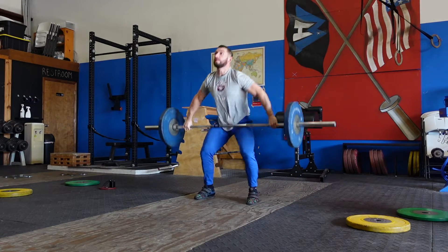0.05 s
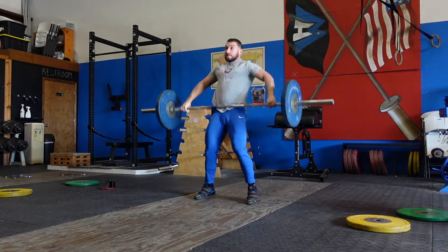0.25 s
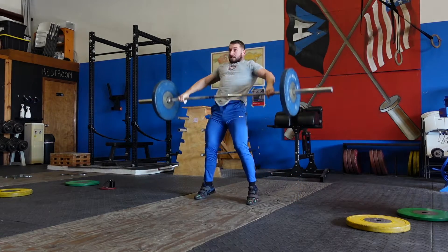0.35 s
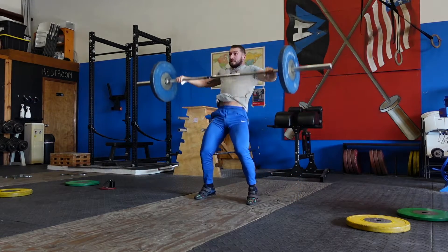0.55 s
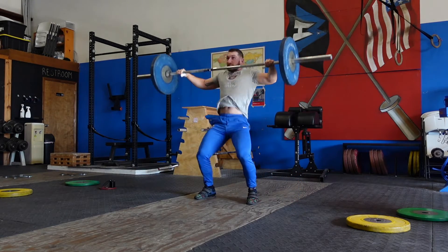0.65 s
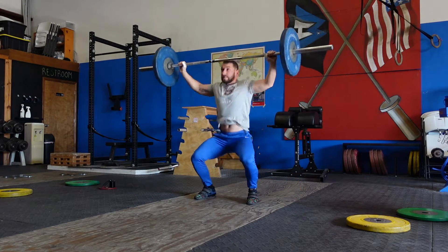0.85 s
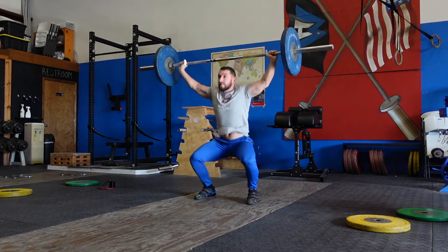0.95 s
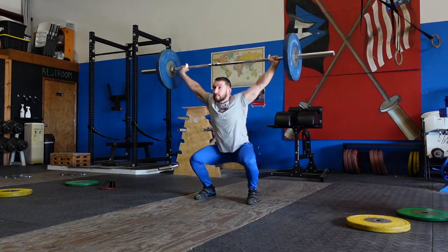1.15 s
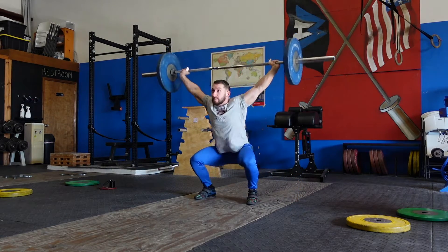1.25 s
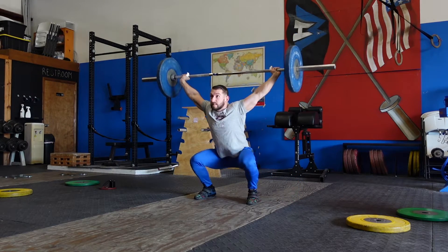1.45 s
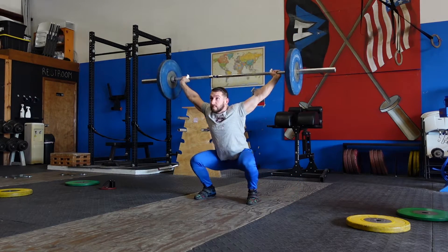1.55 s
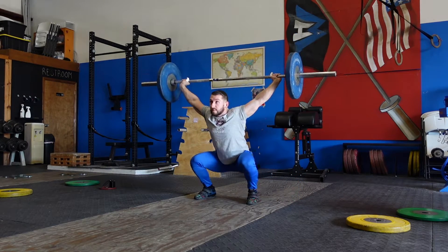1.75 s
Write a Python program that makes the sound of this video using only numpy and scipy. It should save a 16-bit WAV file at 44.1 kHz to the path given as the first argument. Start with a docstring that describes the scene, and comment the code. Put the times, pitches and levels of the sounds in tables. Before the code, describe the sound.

Barbell plates clatter during a quick lift, followed by a foot stamp in an echoing gym.

```python
"""In a large, hard-walled gym, a lifter snatches a barbell from the floor to overhead. The bar brushes
up the thighs, the rubber plates clank and thud on their sleeves (the ends of the bar), and the steel
collars click and rattle through the pull. Both shoes stamp on the wooden platform, the loaded bar hums
and knocks faintly overhead, and the hall rings on over a low ventilation rumble."""
import sys
import numpy as np
from scipy import signal
from scipy.fft import rfft, irfft, next_fast_len
from scipy.io import wavfile

SR = 44100
rng = np.random.default_rng(int(sys.argv[2]) if len(sys.argv) > 2 else 0)


def waveform_to_disk(signal):
    """Save audio, clipped to [-1, 1], as 16-bit WAV at the path in sys.argv[1]."""
    frames = np.transpose(np.atleast_2d(signal))
    scaled = np.clip(frames, -1, 1) * 32767
    samples = np.round(scaled).astype(np.int16)
    wavfile.write(sys.argv[1], SR, samples)


N = 79380
T = np.arange(N) / SR
RING_T = T[:SR // 5]  # the clock for one hit

# Plate hits; the one at 0.33 s is the loud clank's echo off the far wall. Each favours two tones:
# t/s, level/dB, main f/Hz, second f/Hz, second level/dB, level of all tones/dB, onset/s
PLATE_HITS = [(.2000, -40, 1270, 1680, -3, 2, 0.0019), (.2335, -2, 1680, 655, -5, -30, .0036),
              (.2866, 2, 1260, 1150, -8, -28, .0030), (0.3292, -15.5, 1140, 1300, 9, -16, 0.00084),
              (.4683, -7.5, 1740, 710, -3, -13, .0004), (.4780, -7.5, 1220, 611, -6, -18.5, 0.00033),
              (.4885, -52, 1200, 1710, -20, -13, 0.0004), (.5790, -21, 1600, 655, 0, -30, 0.004),
              (.6368, -4, 1150, 1574, -23, -14, 0.0022), (.6420, -5, 770, 1560, -1, -17, .003),
              (1.5040, -23.5, 975, 1834, -18.5, -26, 0.00062), (1.5460, -34, 950, 1170, -15, -29, 0.0023),
              (1.6460, -40, 1620, 1160, 0, -4.5, 0.0018)]
def plates():
    """The plates clank in the pull and knock softly overhead; returns rings and scuffs apart."""
    out = np.zeros((2, N))
    for s, db, main_hz, second_hz, second_db, others_db, onset_s in PLATE_HITS:
        others = amp(others_db) * rng.choice([-1, 1], len(PLATE_TONES))
        favoured = favour(PLATE_TONES, main_hz) + amp(second_db) * favour(PLATE_TONES, second_hz)
        add(out, s, amp(db) * clank(favoured + others, onset_s))
    return out

# The tones of a plate on its sleeve: f/Hz, level/dB, ring time/s
PLATE_TONES = [(655, 0, .028), (770, 0, .028), (950, -2, .024), (1150, -1, .028), (1270, 0, .032),
               (1560, 0, .028), (1680, 0, .03), (1800, -3, .022), (2550, -8, .02), (2870, -8, .025)]
# The noise of plate meeting sleeve: f/Hz, level/dB
SCUFF_COLOUR = [(60, -44), (300, -20.5), (600, 3), (1800, -7.5), (2300, -8.5), (3000, -22), (5000, -27.5),
                (10000, -59)]
def clank(weights, onset_s, t=RING_T):
    """A plate drops against its sleeve: a ring cut short by the rubber, and a scuff."""
    body = ring(PLATE_TONES, weights, t)
    scuff = amp(-14.5) * np.linalg.norm(weights) * noise(SCUFF_COLOUR, len(t)) * fade(t, ring_s=.048)
    return np.array([body, scuff]) * rise(onset_s)

# Collar hits, each with one tone that pings out: t/s, level/dB, ping f/Hz, ping level/dB
COLLAR_HITS = [(0.165, -42, 3730, -4), (0.2118, -37.5, 2940, 4), (0.2323, -32.5, 2920, 11.5),
               (0.2447, -24, 3850, -2), (0.2586, -35, 7540, -12), (0.285, -33.5, 2390, 18.5),
               (0.33, -51, 3920, -12), (0.3407, -31, 6200, 3.5), (0.3918, -28, 5880, 11.5),
               (0.3958, -32, 6200, -2), (0.4244, -28, 4290, -10), (0.47, -24.5, 6230, -5),
               (0.488, -21, 6480, 5.5), (0.5009, -24.5, 4100, 5), (0.5355, -27.5, 4290, -10),
               (0.6015, -25, 6300, -1.5), (0.6422, -25.5, 6330, 8.5), (0.6564, -28.5, 4290, 2.5)]
def collars():
    """The collars click sharply as the loose sleeves knock into place."""
    out = np.zeros(N)
    for s, db, ping_hz, ping_db in COLLAR_HITS:
        add(out, s, amp(db) * click(amp(ping_db) * favour(STEEL_TONES, ping_hz)))
    return out

# The tones of the steel sleeve and collar: f/Hz, level/dB, ring time/s
STEEL_TONES = [(2550, -8.5, 0.024), (2910, -5, 0.021), (3866, -0.5, 0.028), (4280, 0.5, 0.017),
               (4670, -2, 0.023), (5973, -7.5, 0.023), (6260, -5.5, 0.016), (6530, -18.5, 0.04),
               (7260, -19, .02)]
# The noise of steel meeting steel: f/Hz, level/dB
CRACK_COLOUR = [(500, 6.5), (2500, 16), (4500, 3), (6500, 0), (8000, -8.5), (10500, -20.5)]
def click(ping=0):
    """Steel hits steel: a crack and a short, bright ring in which some tones may ping out."""
    count = len(STEEL_TONES)
    weights = amp(-7 + 2 * rng.standard_normal(count)) * rng.choice([-1, 1], count)
    body = ring(STEEL_TONES, weights, detuned()) + ring(STEEL_TONES, ping * np.ones(count), RING_T)
    crack = amp(1.5) * noise(CRACK_COLOUR, len(RING_T)) * fade(RING_T, ring_s=.026)
    return (body + crack) * rise(onset_s=.0004)

# How loud the metallic shimmer is: t/s, level/dB
SHIMMER_LEVELS = [(.328, -18.5), (.37, -19.5), (.42, -20.5), (.46, -27), (0.518, -27), (.62, -27),
                  (.70, -33), (.76, -51)]
def shimmer(pairs_per_s=170, scatter_db=1.5):
    """A dense metallic shimmer: the loud clank echoing round the hall, then light rattling."""
    out = np.zeros(N)
    times, levels = np.transpose(SHIMMER_LEVELS)
    weights = favour(PLATE_TONES, hz=1209) + .5 * amp(-7)
    for slot in np.arange(times[0], times[-1], 1 / pairs_per_s):
        plate_s, steel_s = slot + rng.random(2) / pairs_per_s
        plate_db, steel_db = np.interp(slot, times, levels) + scatter_db * rng.standard_normal(2)
        signs = rng.choice([-1, 1], len(PLATE_TONES))
        tiny_clank = clank(weights * signs, onset_s=.0018, t=detuned())
        add(out, plate_s, amp(plate_db) * tiny_clank.sum(axis=0))
        add(out, steel_s, amp(steel_db - 15) * click())
    return out

# Shoes landing; the hit at 0.78 s is the stamp's echo off the far wall:
# t/s, slap level/dB, thump level/dB
SHOE_HITS = [(0.362, -21, -20.5), (0.465, -18, -24.5), (.7450, -6, -6.5), (0.7836, -19.5, -14.5),
             (0.9414, -12, -18.5)]
# The tones of the platform: f/Hz, level/dB, ring time/s
PLATFORM_TONES = [(125, -13, 0.088), (161, -12, 0.038), (260.4, -6, 0.028), (361, -3.5, 0.027),
                  (540, -44, .018)]
def shoes(slap_hz=720, slap_peak_s=.0018, slap_width_s=.001, thump_lag_s=.0034, bass_cut_hz=93):
    """A flat sole slaps the boards, then the platform thumps."""
    out = np.zeros(N)
    from_peak = RING_T - slap_peak_s
    slap = np.cos(2 * np.pi * slap_hz * from_peak) / np.cosh(from_peak / slap_width_s) ** 2
    slap *= np.minimum(2 * RING_T / slap_peak_s, 1)  # start from silence
    for s, slap_db, thump_db in SHOE_HITS:
        weights = amp(rng.standard_normal(len(PLATFORM_TONES)))
        thump = ring(PLATFORM_TONES, weights, RING_T) * rise(onset_s=.00066)
        add(out, s, amp(slap_db) * slap)
        add(out, s + thump_lag_s, -amp(thump_db) * thump)
    return signal.sosfilt(signal.butter(2, bass_cut_hz, "high", fs=SR, output="sos"), out)

# How loud the low thud is: t/s, level/dB
THUD_LEVELS = [(.20, -56.5), (.26, -42), (.36, -39.5), (.48, -40.5), (.62, -42), (.74, -72)]
# The deep noise of the thud: f/Hz, level/dB
THUD_COLOUR = [(50, -34), (100, -0.5), (140, 2.5), (210, -5), (290, -20), (450, -8.5), (900, -13.5),
               (3000, -90)]
def plate_thud():
    """A low thud and rumble under the plate clanks."""
    return swell(THUD_LEVELS, THUD_COLOUR)

# The bar's slide up the thighs: t/s, level/dB
SLIDE_LEVELS = [(.07, -71), (.105, -52.5), (.135, -43), (.16, -54.5), (.22, -48.5), (.30, -81)]
# The hiss of rubbed cloth: f/Hz, level/dB
CLOTH_COLOUR = [(300, -23.5), (1400, 6.5), (2500, 8), (3000, 15), (4000, 6), (6500, 2), (8000, -8.5),
                (10500, -18)]
def trousers():
    """The cloth swishes as the bar rubs over it."""
    return swell(SLIDE_LEVELS, CLOTH_COLOUR)

# The tones of the bending bar: f/Hz, level/dB, ring time/s
BAR_TONES = [(114.1, -40, 7.2), (184.7, -46, 8.2), (213.5, -48.5, 9)]
def bar_hum(catch_s=.64, swell_s=.027):
    """Once caught, the bar quivers under its load and hums."""
    t = np.maximum(T - catch_s, 0)
    return ring(BAR_TONES, np.ones(len(BAR_TONES)), t) * (1 - np.exp(-t / swell_s))

# How long the hall echoes: f/Hz, ring time/s
ECHO_TIMES = [(100, 1.8), (220, 1.06), (400, 1.18), (700, 1.24), (1400, 1.66), (3000, 1.75), (6000, 0.85),
              (10000, 1.54)]
# How strong the echo is, from low to high: f/Hz, level/dB
ECHO_COLOUR = [(80, -13), (200, 12.5), (500, -4), (1200, -0.5), (3000, -3.5), (6000, -3), (10000, 0)]
# How wide the echo is, as side (left minus right) against mid (shared by both): f/Hz, level/dB
ECHO_WIDTH = [(40, -34), (120, -39), (300, -13), (1200, -13.5), (4000, -16), (10000, -53)]
def hall(sound, direct_db=0, far_wall_s=.04, near_db=-6.5):
    """The sound itself, weak echoes from nearby, then the far walls' wash; returns mid and side."""
    hz, t, bands = signal.stft(rng.standard_normal((2, N)), SR, nperseg=512)
    colour = amp(along(ECHO_COLOUR, hz) + np.outer([0, 1], along(ECHO_WIDTH, hz)))
    bands = bands * fade(t, along(ECHO_TIMES, hz)[:, None]) * colour[:, :, None]
    tail = signal.istft(bands, SR, nperseg=512)[1][:, :N]
    tail *= np.where(T < far_wall_s, amp(near_db), 1)
    mid, side = np.sqrt(10 / SR) * signal.fftconvolve(sound[None], tail, axes=1)[:, :N]
    return np.array([amp(direct_db) * sound + mid, side])

# The rumble of moving air: f/Hz, level/dB
VENT_COLOUR = [(20, -14), (36, 3), (50, 1), (72, 5.5), (120, 2), (160, -17), (220, -18), (400, -22),
               (1000, -23.5), (1600, -33), (3000, -37.5), (4500, -39.5), (7000, -43), (10500, -46)]
def ventilation():
    """Air from the vents rumbles low and steady; returns mid and side."""
    return amp(-45) * np.array([noise(VENT_COLOUR, N), amp(-15) * noise(VENT_COLOUR, N)])

def amp(db):
    """Turn decibels into a multiplier."""
    return 10 ** (np.asarray(db) / 20)

def along(points, hz):
    """Read a table between its rows, on a scale of pitch."""
    f, values = np.transpose(points)
    return np.interp(np.log(hz + 1), np.log(f + 1), values)

def noise(colour, size):
    """Noise of strength 1, with the given balance of low and high."""
    gains = amp(along(colour, np.fft.rfftfreq(size, 1 / SR)))
    x = irfft(rfft(rng.standard_normal(size)) * gains, size)
    return x / np.sqrt(np.mean(x ** 2) + 1e-20)

def swell(levels, colour):
    """Noise that grows and fades along a table of levels."""
    s, db = np.transpose(levels)
    return amp(np.interp(T, s, db)) * noise(colour, N) * (T > s[0]) * (T < s[-1])

def rise(onset_s):
    """The soft start of a hit."""
    return 1 - np.exp(-(RING_T / onset_s) ** 2)

def fade(t, ring_s):
    """Die away by 60 dB in one ring time."""
    return 1000. ** (-t / ring_s)

def ring(tones, weights, t):
    """Add up fading tones, each with its own weight."""
    hz, db, ring_s = np.transpose(tones)[:, :, None]
    return weights @ (amp(db) * np.sin(2 * np.pi * hz * t) * fade(t, ring_s))

def favour(tones, hz):
    """Weights that pick out the tones within about 6% of a pitch."""
    return np.exp(-(np.log(np.transpose(tones)[0] / hz) / .062) ** 2)

def detuned():
    """A clock that runs a little fast or slow, so no two small hits ring alike."""
    return RING_T * (1 + .025 * rng.standard_normal())

def add(track, s, sound):
    """Mix a sound in at s seconds."""
    part = track[..., max(round(s * SR), 0):][..., :sound.shape[-1]]
    part += sound[..., :part.shape[-1]]

def scene(lean_right_db=.34):
    """Barbell and lifter set the hall ringing, near the centre; returns left and right."""
    air = ventilation()
    rings, scuffs = plates()
    clatter = hall(rings) + hall(scuffs, direct_db=-6)  # scuffs are hidden between the plates
    clatter += hall(shimmer(), direct_db=.5) + hall(collars())
    mid, side = clatter + hall(shoes() + plate_thud() + trousers()) + air
    balance = amp([[-lean_right_db], [lean_right_db]])
    return np.array([mid + side, mid - side]) * balance + bar_hum()

def record(dry):
    """Cut away the very highest treble."""
    top_hz = 10900
    size = next_fast_len(N + SR // 2)
    return irfft(rfft(dry, size) * (np.fft.rfftfreq(size, 1 / SR) < top_hz), size)[:, :N]

dry = scene()
out = record(dry)
waveform_to_disk(out)
```